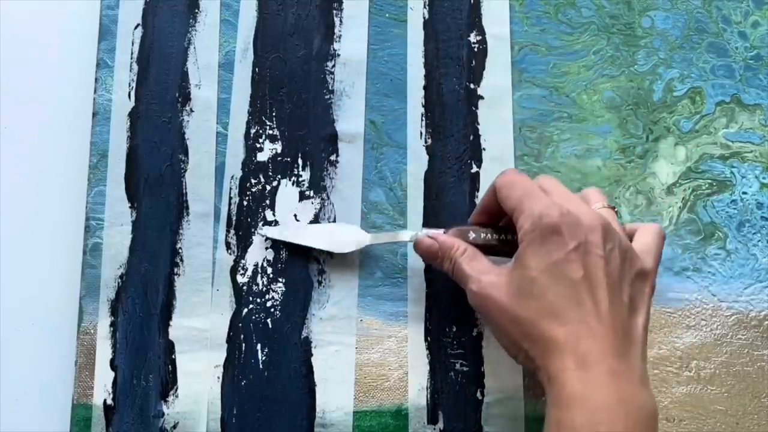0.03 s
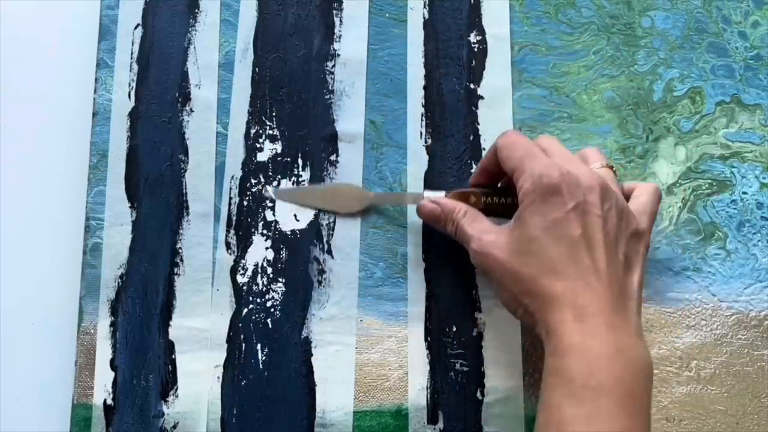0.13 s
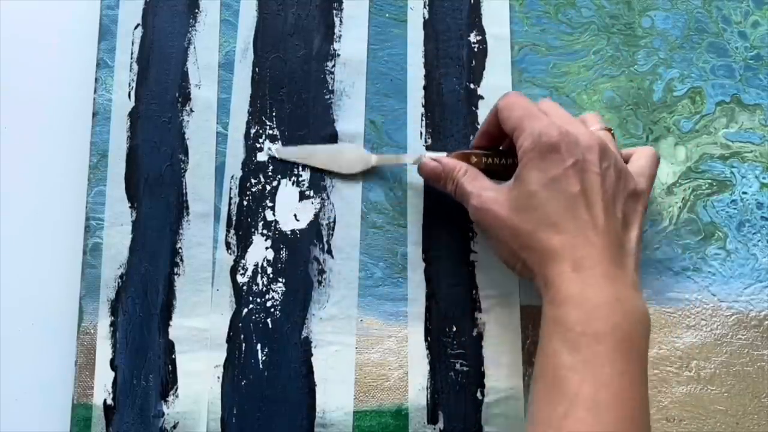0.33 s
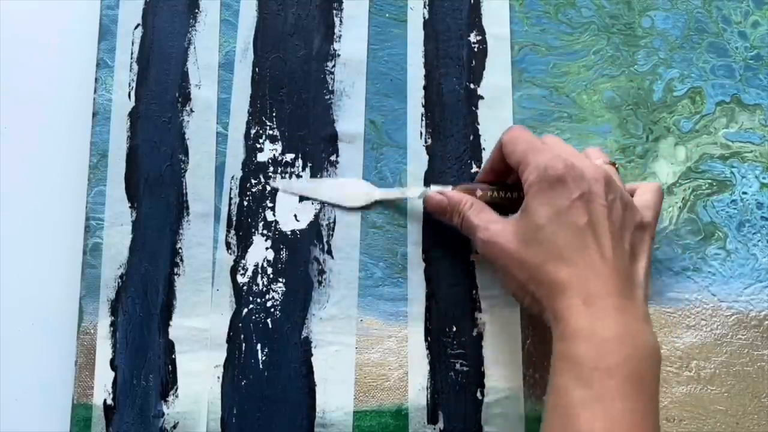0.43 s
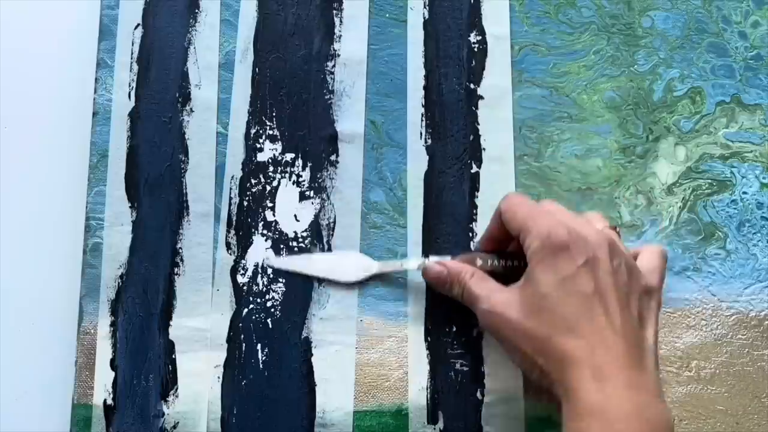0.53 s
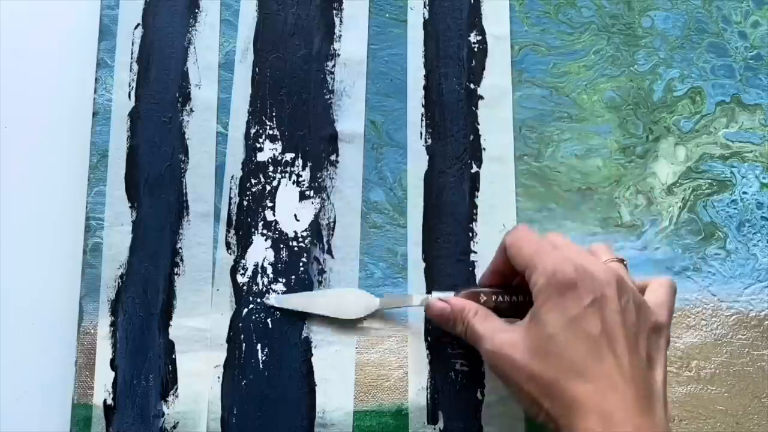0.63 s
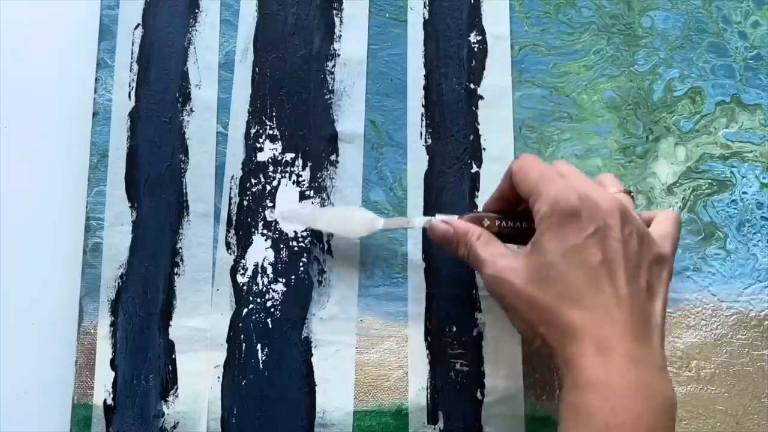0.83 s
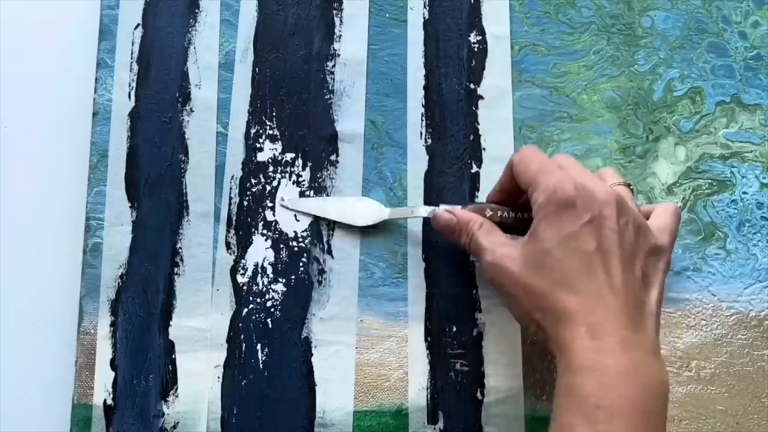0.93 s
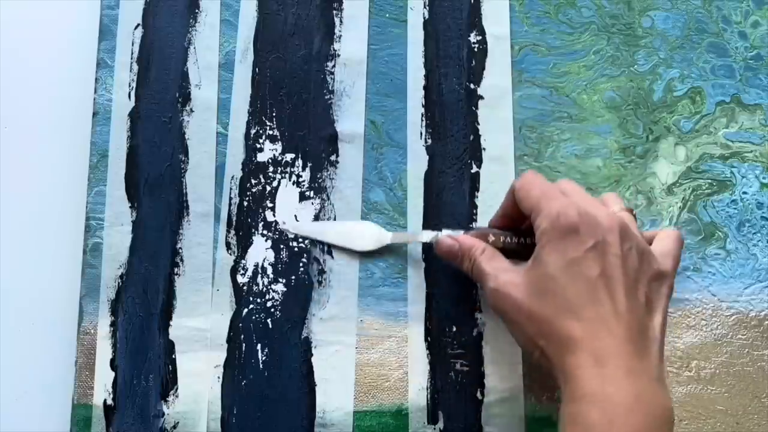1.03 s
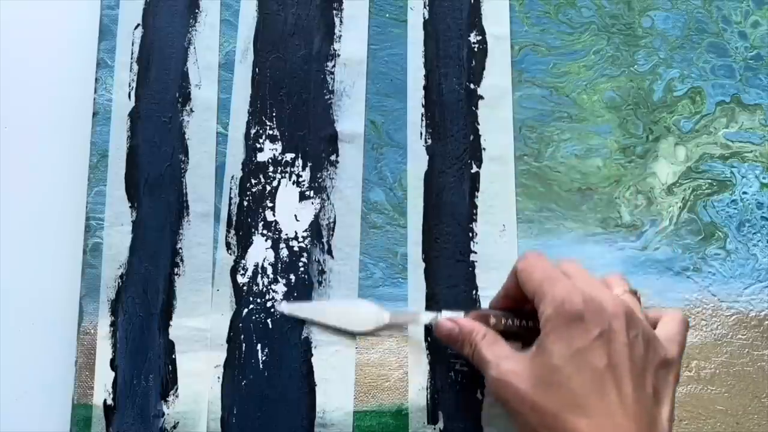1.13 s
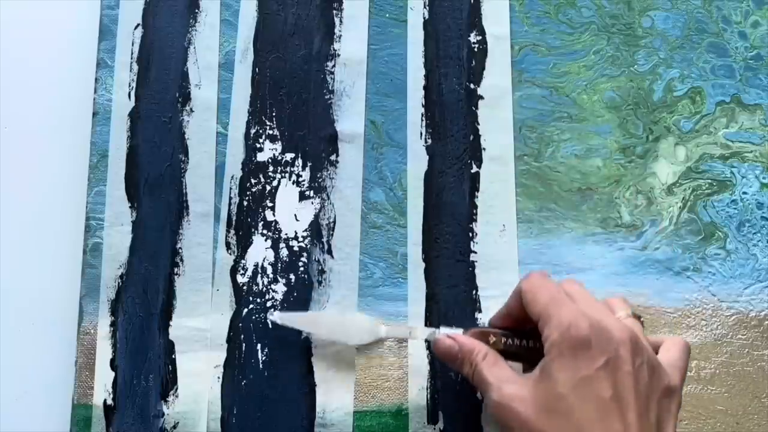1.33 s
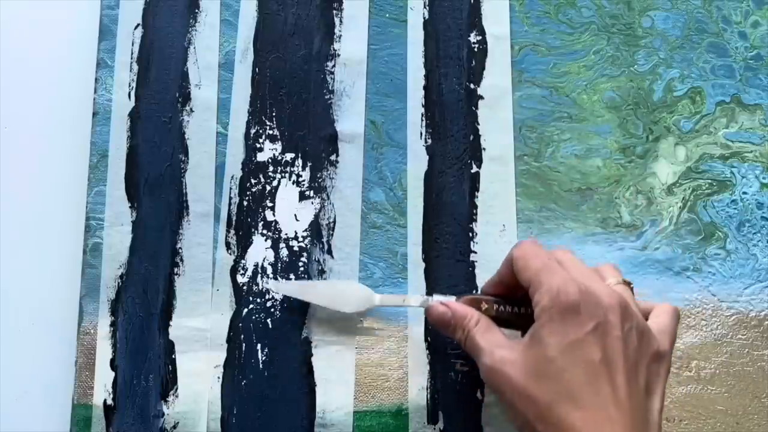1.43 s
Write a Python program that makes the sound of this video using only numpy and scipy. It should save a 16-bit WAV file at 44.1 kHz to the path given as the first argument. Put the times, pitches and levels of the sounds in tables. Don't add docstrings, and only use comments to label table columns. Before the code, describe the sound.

Close up in a quiet room, a thin metal blade drags grittily over canvas three times, with small hollow drum-like thumps, gritty hiss and tiny pings; the second scrape is strongest, low hum beneath.

```python
import sys
import numpy as np
from scipy import signal
from scipy.fft import rfft, irfft
from scipy.io import wavfile
from scipy.ndimage import uniform_filter1d

SR = 44100
rng = np.random.default_rng(int(sys.argv[2]) if len(sys.argv) > 2 else 0)


def to_linear_factor(level_db):
    exponent = np.asarray(level_db, float) / 20
    return 10 ** exponent


def log_audio(samples):
    frames = np.atleast_2d(samples).T
    limited = np.clip(frames, -1, 1)
    pcm = np.round(limited * 32767).astype(np.int16)
    wavfile.write(sys.argv[1], SR, pcm)


N = 66150

# (frequency [Hz], width [Hz])
BLADE_MODES = [(3550, 830), (8470, 240), (14420, 290)]


def evened(x):
    return x / np.sqrt(np.mean(x ** 2) + 1e-20)


def read(points, hz):
    f, value = np.transpose(points)
    return np.interp(np.log(hz + 1), np.log(f + 1), value)


def colour(x, gain):
    return irfft(rfft(x) * gain(np.fft.rfftfreq(N, 1 / SR)), N)


def resonate(x, hz, width):
    r = np.exp(-np.pi * width / SR)
    return 2 * signal.lfilter([1 - r], [1, -r * np.exp(2j * np.pi * hz / SR)], x).real


def resonate_twice(x, hz, first_width, second_width):
    return resonate(resonate(x, hz, first_width), hz, second_width)


def clicks(per_s, spread_db):
    happens = rng.random(N) < per_s / SR
    sign = rng.choice([-1., 1.], N)
    size = to_linear_factor(spread_db * np.minimum(rng.exponential(1, N), 4))
    return evened(happens * sign * size)


def ports(x):
    # (frequency [Hz], lead [rad])
    port_lead = [(0, 0), (5200, 0), (6850, -np.pi), (8400, -2 * np.pi), (10200, -6.6),
                 (11900, -2.88 * np.pi), (13650, -3.13 * np.pi), (14400, -3.8 * np.pi)]
    # (frequency [Hz], level [dB])
    loose_tone = [(300, -15.5), (700, -3.5), (1100, -5), (1700, -3), (2500, -19.5), (8000, -15.5),
                  (15000, 1)]
    f, lead = np.transpose(port_lead)
    pair = np.array([colour(x, lambda hz: np.exp(side * .5j * np.interp(hz, f, lead)))
                     for side in (1, -1)])
    echo = rng.standard_normal(1200) * np.exp(-np.arange(1200) / 400.)
    scattered = np.convolve(x, echo / np.linalg.norm(echo))[:N]
    loose = colour(scattered, lambda hz: to_linear_factor(read(loose_tone, hz)) * (hz > 330))
    return pair + np.array([loose, -loose])


def floor():
    # (frequency [Hz], level [dB]); then its overall level [dB]
    hum_tone, hum_db = [(15, -67), (25, 9), (81, -3.5), (113, -7), (204, -14), (221, -3.5), (257, -20),
                        (282, -17), (400, -27), (520, -66), (880, -120)], -56
    # (frequency [Hz], level [dB]); then its overall level [dB]
    hiss_tone, hiss_db = [(180, -45.5), (300, 10.5), (654, -3.5), (973, -3), (1070, -9), (1710, -9.5),
                          (2260, -13.5), (5100, -20.5), (15700, -28)], -77
    # (frequency [Hz], width [Hz], level [dB])
    wavering = [(59, 20, -70), (154, 12, -69), (201, 14, -71)]
    # (time [s], level [dB])
    hum_swell = [(0, 4), (0.101, -3), (.25, 2.5), (.45, 1), (0.651, 5), (0.847, -3.5), (0.999, -0.5),
                 (1.2, 2.5), (1.5, -4)]
    hum_noise, side_noise, hiss_noise, hiss_side, tone_noise = rng.standard_normal((5, N))
    wide = .12 * np.array([side_noise, -side_noise])

    def low(hz):
        return to_linear_factor(read(hum_tone, hz) - 40 * (hz > 400))

    def high(hz):
        return to_linear_factor(read(hiss_tone, hz) - 40 * (hz < 400) - 30 * (hz > 11700))

    hum = to_linear_factor(hum_db - 2.5) * evened(colour(hum_noise + wide, low))
    for hz, width, db in wavering:
        hum += to_linear_factor(db) * evened(resonate_twice(tone_noise + 0.37 * wide, hz, width, 2 * width))
    swell = to_linear_factor(np.interp(np.arange(N) / SR, *np.transpose(hum_swell)))
    hiss = ports(hiss_noise) + 0.36 * np.array([hiss_side, -hiss_side])
    return swell * hum + to_linear_factor(hiss_db) * evened(colour(hiss, high))


def canvas_drumming(pitch_hz, upper_db):
    # (multiple of pitch [ratio], width [Hz], level [dB])
    canvas_modes = [(.95, 200, 0), (1.2, 230, 0), (1.65, 280, -8), (2.3, 320, -11)]
    slips = clicks(per_s=900, spread_db=2.5) + 1.06 * rng.standard_normal(N)
    skin = np.zeros(N)
    for ratio, width, db in canvas_modes:
        gain = to_linear_factor(db + upper_db * (ratio > 1.6))
        skin += gain * resonate_twice(slips, pitch_hz * ratio, 2.2 * width, width)
    return evened(skin)


def grit_rub():
    lumps = to_linear_factor(1.9 * evened(uniform_filter1d(rng.standard_normal(N), size=200)))
    return lumps * (rng.standard_normal(N) + 0.84 * clicks(2500, spread_db=1.5))


def grit_hiss(rub, dull_db):
    # (frequency [Hz], level [dB])
    grit_tone = [(300, -13.5), (1500, -10.5), (2400, 1), (4500, -11), (6500, -4.5), (9000, -2),
                 (11500, -14), (15500, -13)]
    return evened(colour(rub, lambda f: to_linear_factor(read(grit_tone, f) + dull_db * np.log2(1 + f / 3000))))


def shank_ring(rub):
    # (frequency [Hz], width [Hz], level [dB])
    shank_modes = [(2250, 120, -29), (2883, 80, -21), (4364, 43, -23), (11420, 200, -20)]
    return sum(to_linear_factor(db) * evened(resonate(rub, hz, width)) for hz, width, db in shank_modes)


def blade_ring(rub, drive, mode_db, bend):
    ring = np.zeros(N)
    for db, (hz, width) in zip(mode_db, BLADE_MODES):
        steady = np.std(resonate_twice(rub, hz, 3 * width, width))
        ring += to_linear_factor(db) * resonate_twice(drive * rub, hz * bend, 3 * width, width) / steady
    return ring


def strokes():
    # (time [s], pressure on canvas [dB], edge speed as grit [dB])
    motion = [
        [(.125, -71, -78), (.132, -59.5, -73.5), (.15, -58.5, -59.5), (.164, -53, -61), (.172, -52.5, -70.5),
         (.19, -53, -56.5), (.205, -56, -62), (.235, -53, -70.5), (.255, -61, -87)],
        [(.372, -81.5, -72.5), (.41, -48.5, -71.5), (.435, -47, -47.5), (.47, -39.5, -40.5), (.525, -41, -37.5),
         (.575, -36, -44.5), (.6, -43, -49.5), (.613, -58, -61.5), (.71, -71, -78.5)],
        [(1.061, -59, -81), (1.067, -51, -60), (1.08, -46, -64), (1.09, -41, -55), (1.12, -42, -53),
         (1.145, -49.5, -54), (1.16, -39.5, -50.5), (1.18, -42, -57.5), (1.195, -56.5, -94)],
        [(.955, -63, -101), (.975, -59.5, -90), (.99, -75, -95), (1.0, -79, -84), (1.02, -78.5, -95)],
    ]
    # (canvas pitch [Hz], low, mid, high blade mode [dB], upper canvas modes [dB])
    grip = [(520, -8.5, -4.5, -3, 0.5), (662, -13, -7, -32, -5), (500, -6.5, -15, -9, -6),
            (520, -8, -11, -10.5, -24)]
    # (treble tilt of the grit, negative is duller [dB/octave])
    dullness = [1, 0.5, -4.5, 5]
    bends = [1, 1.014, 1, 1]
    t, canvas, edge = np.arange(N) / SR, np.zeros(N), np.zeros(N)
    for curve, (hz, *mode_db, upper_db), dull_db, bend in zip(motion, grip, dullness, bends):
        s, press_db, speed_db = np.transpose(curve)
        contact = np.clip(np.minimum(t - s[0], s[-1] - t) / 0.0091, 0, 1)
        canvas += contact * to_linear_factor(np.interp(t, s, press_db) - 6) * canvas_drumming(hz, upper_db)
        drive = contact * to_linear_factor(np.interp(t, s, speed_db))
        rub = grit_rub()
        edge += drive * to_linear_factor(-2.0) * grit_hiss(rub, dull_db)
        edge += drive * shank_ring(rub)
        edge += blade_ring(rub, drive, mode_db, bend)
    return canvas, edge


def pings():
    # (time [s], peak level [dB], pitch [Hz])
    grains = [(.132, -64, 3500), (.141, -59, 3760), (.150, -50.5, 3300), (.156, -53, 3700),
              (.161, -54, 3470), (.179, -55, 3730), (.187, -48, 3360), (.192, -52.5, 3640),
              (.198, -55, 3860), (.208, -50, 3740), (.230, -52, 3830), (.437, -54, 2290), (.442, -48, 2080),
              (.456, -36.5, 2280), (.475, -34.5, 2350), (.477, -36.5, 3980), (.493, -38.5, 2250),
              (.517, -47, 2380), (.522, -36, 2824), (.556, -46, 2900), (.566, -44.5, 2880),
              (.575, -38, 3810), (.598, -42.5, 1450), (1.067, -58, 2060), (1.088, -43.5, 2250),
              (1.097, -41, 2110), (1.104, -40.5, 2400), (1.133, -44, 3590), (1.155, -52, 9450),
              (1.157, -43, 3710), (1.160, -41.5, 3180), (1.164, -41.5, 2725), (1.174, -45.5, 3460),
              (1.177, -52.5, 8760), (1.180, -51, 2350), (1.196, -54.5, 1750), (1.204, -55.5, 1740),
              (1.184, -60, 3430), (1.199, -63, 3480), (1.218, -61, 3500), (1.090, -57, 5750),
              (1.107, -53.5, 5400), (1.13, -49.5, 5400)]
    t, out = np.arange(1500) / SR, np.zeros(N + 1500)
    shape = (1 - np.exp(-t / .001)) * to_linear_factor(-60 * t / .022)
    for s, db, hz in grains:
        out[round(s * SR):][:len(t)] += to_linear_factor(db + 2) * shape * np.sin(2 * np.pi * hz * t)
    return out[:N]


def catches():
    # (time [s], peak level [dB], pitch [Hz], upper mode [dB], rise [s])
    bumps = [(.211, -43, 520, -34, 0.0015), (0.2238, -38, 515, -5.5, 0.0022),
             (.364, -54.5, 557, -8.5, 0.0035), (.412, -39, 569, -5, 0.0016),
             (0.4596, -24.5, 632, -18, 0.0015), (.488, -38, 710, -11, 0.0034),
             (.553, -32.5, 633, -4.5, 0.0026), (.476, -32.5, 616, -18, 0.0033),
             (.5245, -29, 653, -14, 0.0015), (0.5316, -28, 630, -14, 0.0016),
             (.586, -31, 520, -16.5, 0.0012), (0.95, -47.5, 522, -8, 0.0021), (.9995, -58, 563, -18, 0.0022),
             (1.088, -36, 528, -8.5, 0.003045), (1.135, -38, 610, -2.5, 0.0024),
             (1.156, -40, 520, 3, 0.0031), (1.165, -32.5, 595, -1.5, 0.0011)]
    # (time [s], peak level [dB], pitch [Hz])
    more_bumps = [(.133, -55.5, 556), (.152, -50.5, 526), (.160, -50, 518), (.169, -51, 520), (.180, -51, 750),
                  (0.187, -46.5, 500), (.198, -56, 557), (.240, -54, 870), (.150, -55.5, 1085),
                  (.161, -56.5, 1050), (0.172, -53, 1010), (0.187, -56, 960), (0.251, -57, 1150),
                  (.420, -42, 520), (0.431, -41.5, 552), (.444, -37, 695), (.451, -44, 774), (.467, -32, 725),
                  (.499, -41.5, 774), (.512, -37.5, 713), (.518, -39.5, 740), (.541, -40, 732),
                  (.560, -39, 687), (.569, -46, 730), (.591, -40.5, 718), (.600, -40, 491),
                  (1.0645, -54, 1114), (1.090, -43, 1250), (1.100, -45, 1275), (1.080, -42, 540),
                  (1.096, -47, 434), (1.103, -41.5, 458), (1.108, -40, 475.6), (1.112, -51, 1220),
                  (1.123, -35, 563), (1.129, -42.5, 1280), (1.145, -39.5, 467), (1.160, -34, 500),
                  (1.173, -40, 500), (1.179, -41, 561)]
    padded = [(*row, -10, 0.002) for row in more_bumps]
    t, canvas = np.arange(1500) / SR, np.zeros(N + 1500)
    for s, db, hz, upper_db, rise in [*bumps, *padded]:
        i, u, v = round(s * SR), t / rise, t / 0.001
        canvas[i:i + 1500] += to_linear_factor(db) * u * np.exp(1 - u) * np.sin(2 * np.pi * hz * t)
        upper = v * np.exp(1 - v) * np.sin(2 * np.pi * 1.833 * hz * t)
        canvas[i:i + 1500] += to_linear_factor(db + upper_db) * upper
    return canvas[:N]


def cracks():
    # (time [s], level [dB], centre [Hz], width [Hz], decay [s])
    tears = [
        (0.1474, -68, 2030, 4000, .002),
        (0.2232, -45.5, 1480, 2495, 0.0043),
        (0.398, -55, 3410, 1393, 0.0098),
        (.398, -53, 8340, 5000, .005),
        (0.995, -80.5, 3000, 9000, 0.0025),
        (1.0662, -60, 3000, 7000, 0.0026),
        (1.0895, -46, 3160, 4960, 0.0026),
        (1.154, -47.5, 9200, 2480, 0.002),
        (1.156, -39.5, 3650, 5000, 0.0014),
        (1.1664, -44, 2180, 2940, .003),
    ]
    t, edge = np.arange(1500) / SR, np.zeros(N + 1500)
    for s, db, hz, width, decay in tears:
        puff = evened(resonate_twice(rng.standard_normal(1500), hz, width, width))
        edge[round(s * SR):][:1500] += to_linear_factor(db) * puff * np.exp(-t / decay)
    return edge[:N]


def ticks():
    # (time [s], mid mode [dB], low mode [dB], high mode [dB])
    hits = [
        (0.57, -30, -92, -60),
        (.968, -75.5, -67.5, -81),
        (.996, -76, -83, -72),
        (1.067, -56.5, -72, -62),
        (1.092, -41, -59, -68),
        (1.116, -42.5, -76, -72),
        (1.178, -54.5, -52, -69),
    ]
    flatness = (.95, 1, 1)
    t, edge = np.arange(1500) / SR, np.zeros(N + 1500)
    for s, mid_db, low_db, high_db in hits:
        i, levels = round(s * SR), (low_db, mid_db, high_db)
        for db, (hz, _), t60, flat in zip(levels, BLADE_MODES, (.025, .05, .05), flatness):
            envelope = to_linear_factor(db + 5 - 60 * t / t60) * (1 - np.exp(-t / 0.00217))
            edge[i:i + 1500] += envelope * np.sin(2 * np.pi * flat * hz * t)
    return edge[:N]


def room(x):
    # (frequency [Hz], level [dB])
    tail_tone = [(300, 4), (700, -0.5), (1100, 4), (1600, 8.5), (2600, 2), (5000, 4.5), (11500, -2),
                 (14500, 4)]
    # (frequency [Hz], t60 [s])
    tail_t60 = [(300, 0.42), (700, 0.3), (1100, 0.24), (1600, 0.36), (3500, 0.23), (7000, 0.24),
                (11500, 0.17), (15000, 0.15)]
    taps = np.zeros((2, 30000))
    at = np.arange(300, 29900, 20) + rng.integers(0, 20, (2, 1480))
    np.put_along_axis(taps, at, rng.choice([-1., 1.], at.shape), 1)
    hz, t, z = signal.stft(taps, SR, nperseg=256)
    fade_db = read(tail_tone, hz)[:, None] - 60 * t / read(tail_t60, hz)[:, None]
    tail = signal.istft(z * to_linear_factor(fade_db), SR, nperseg=256)[1]
    shared, apart = signal.fftconvolve(x[None], tail / np.linalg.norm(tail[0]), axes=1)[:, :N]
    return ports(shared) + to_linear_factor(-13.0) * np.array([apart, -apart])


def scene():
    background = floor()
    canvas, edge = strokes()
    edge = edge + pings() + cracks() + ticks()
    canvas = canvas + catches()
    pan = to_linear_factor(np.array([[.5], [-.5]]) * 2.1)
    return ports(canvas) * pan + ports(edge) + to_linear_factor(-13.5) * room(canvas + edge) + background


def top_cut(x):
    return signal.sosfilt(signal.butter(12, 15880, fs=SR, output="sos"), x)


def record(dry):
    def band(hz):
        treble = np.sin(np.pi / 2 * np.clip((15850 - hz) / 300, 0, 1)) ** 2
        return treble / (1 + (50 / (hz + 1)) ** 4)

    mix = colour(dry, band)
    return top_cut(mix)


dry = scene()
out = record(dry)
log_audio(out)
```